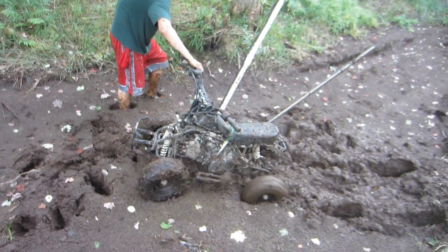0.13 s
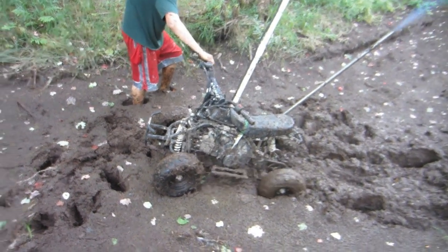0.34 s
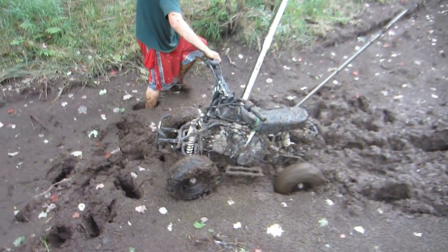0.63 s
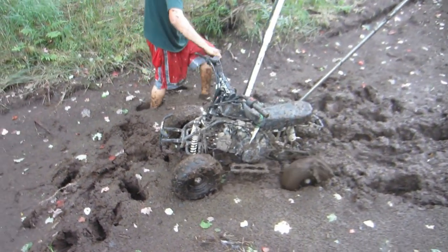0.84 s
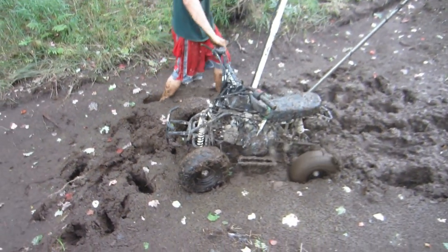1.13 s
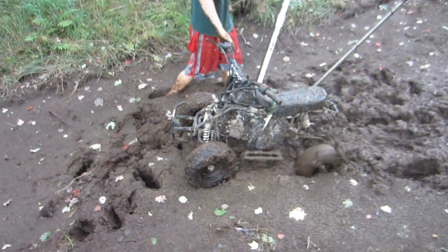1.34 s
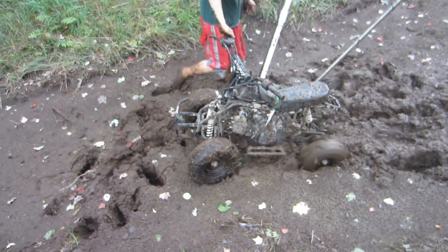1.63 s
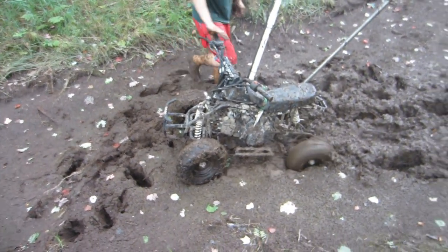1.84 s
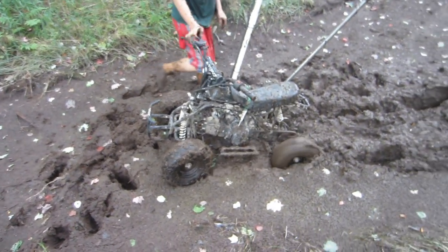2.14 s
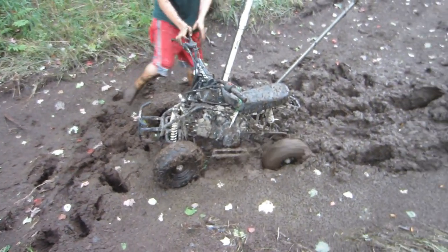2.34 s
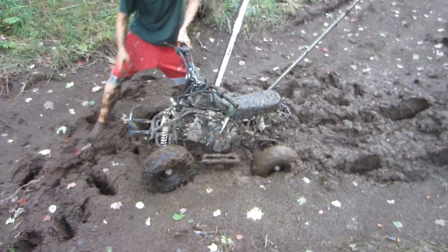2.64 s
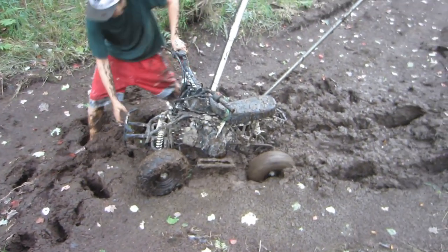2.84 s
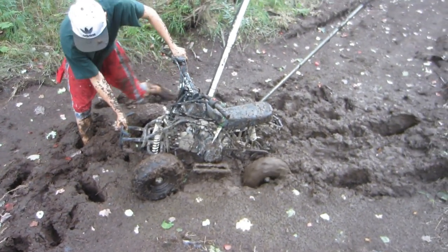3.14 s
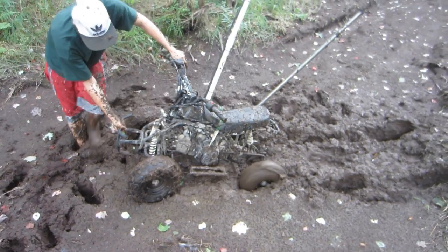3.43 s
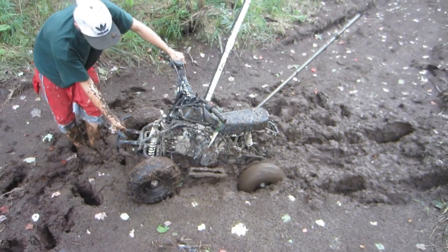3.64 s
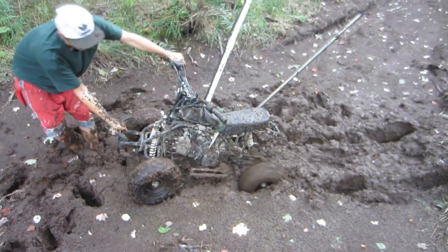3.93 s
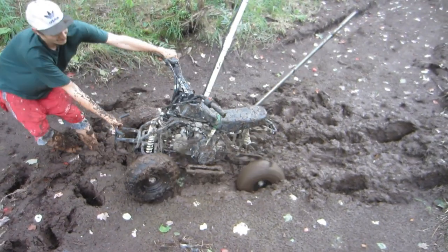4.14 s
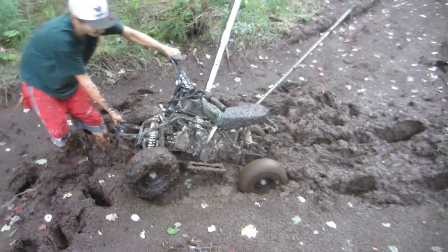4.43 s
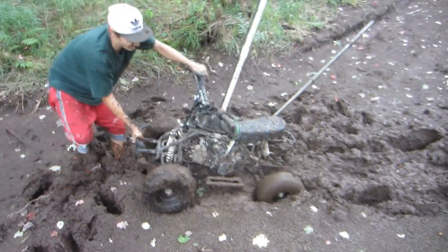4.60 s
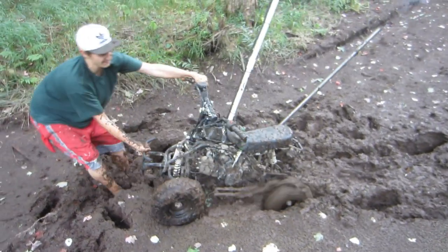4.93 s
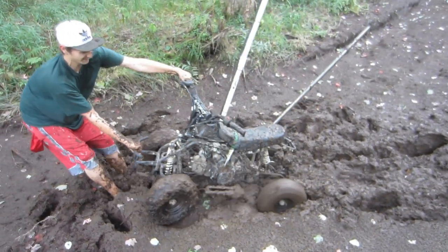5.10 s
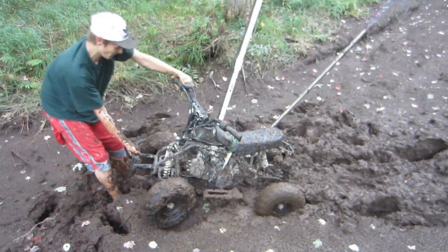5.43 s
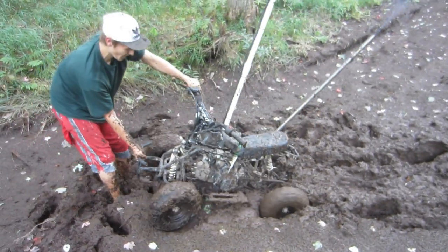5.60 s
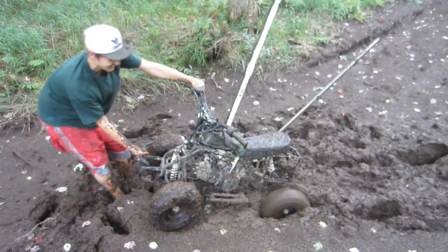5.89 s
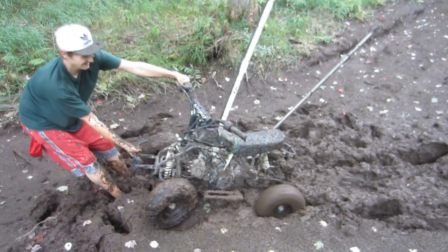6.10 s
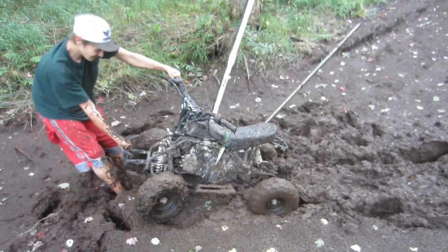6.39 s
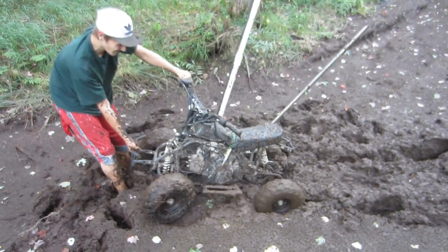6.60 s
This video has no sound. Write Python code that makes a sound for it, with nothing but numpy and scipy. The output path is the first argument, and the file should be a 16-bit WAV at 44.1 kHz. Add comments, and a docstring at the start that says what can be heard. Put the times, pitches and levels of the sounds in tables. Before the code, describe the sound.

Outdoors and close by, a small single-cylinder four-stroke quad bike is revved while stuck. Sharp barking exhaust bursts climb to a fast buzzing rasp, then drop into a hollow silencer drone with metal rattle and valve ticking. Pops crackle as the revs fall. A second big rev peaks higher, then the engine nearly dies twice and catches again. The near microphone overloads slightly; trees return only a faint scatter.

```python
"""A silencer drones over the clatter of an idling engine, and then short bursts of throttle bark out across the mud:
a small four-stroke single-cylinder quad bike, stuck outdoors, is revved close to two microphone ports.
Open, each cycle emits a pressure spike, steepest near certain speeds, with returns along the pipe and off the ground.
Shut, pushes of gas ring the silencer and loose parts rattle; the pipe pops as the revs fall, and twice the engine
nearly dies. One crankshaft curve and one throttle curve drive the engine's layers; woods scatter the bark faintly."""
import sys
import numpy as np
from scipy import signal
from scipy.fft import rfft, irfft
from scipy.io import wavfile

SR = 44100
rng = np.random.default_rng(int(sys.argv[2]) if len(sys.argv) > 2 else 0)


def dump(signal):
    """Clip the signal to [-1, 1] and save it as 16-bit WAV at the path in sys.argv[1]."""
    limited = np.clip(np.atleast_2d(signal).T, -1, 1)
    pcm = np.round(limited * 32767).astype(np.int16)
    wavfile.write(sys.argv[1], SR, pcm)


N = 297675
TIME = np.arange(N) / SR
MS = 1 / 1000  # seconds in a millisecond
CRUISE_RATE = 28  # reference speed, firings per second


def amp(db):
    """Level to amplitude: 20 dB is a factor of ten."""
    return 10 ** (np.asarray(db) / 20)


def evened(x):
    """Normalisation to unit rms, the measure of effective pressure."""
    return x / np.sqrt(np.mean(x ** 2) + 1e-20)


def curve(rows, at, axis=1):
    """Linear interpolation of one column against the first column of a table."""
    rows = np.asarray(rows)
    return np.interp(at, rows[:, 0], rows[:, axis])


def read(points, hz):
    """Linear interpolation of a spectrum on a log-frequency axis."""
    f, value = np.transpose(points)
    return np.interp(np.log(hz + 1), np.log(f + 1), value)


def colour(x, points):
    """Minimum-phase filtering: the phase follows from the (frequency [Hz], gain [dB]) response by causality."""
    size = 4096
    log_gain = np.log(amp(read(points, abs(np.fft.fftfreq(size, 1 / SR)))))
    spectrum = np.exp(np.conj(signal.hilbert(log_gain)))
    taps = np.fft.ifft(spectrum).real[:size // 2]
    return np.apply_along_axis(lambda v: signal.oaconvolve(v, taps)[:N], -1, x)


def ring(x, modes):
    """Modal superposition: parallel resonances, each with its gain at the centre."""
    return sum(amp(db) * signal.lfilter(*signal.iirpeak(hz, hz / width, SR), x) for hz, width, db in modes)


def glide(x, hz, width):
    """Heterodyning: a resonance follows a frequency curve by shifting it to zero frequency and back."""
    turn = np.exp(2j * np.pi * np.cumsum(hz) / SR)
    r = np.exp(-np.pi * width / SR)
    return 2 * (turn * signal.lfilter([1 - r], [1, -r], x / turn)).real


def lagged(x, seconds):
    """First-order relaxation: a control is followed with a time constant."""
    keep = np.exp(-1 / (seconds * SR))
    return signal.lfilter([1 - keep], [1, -keep], x)


def add(mix, s, sound):
    """Linear superposition of a sound that starts at a given time."""
    start = round(s * SR)
    part = mix[max(start, 0):max(start + len(sound), 0)]
    part += sound[max(-start, 0):][:len(part)]


# likeness of diffuse sound at the two ports: (frequency [Hz], likeness [0-1])
PORT_LIKENESS = [(100, 1), (1000, 0.93), (2500, 0.92), (5000, 0.99), (9000, 1), (14000, 0.42)]


def noise():
    """Diffuse-field coherence: white noise at two ports whose likeness depends on frequency."""
    a, b = rfft(rng.standard_normal((2, N)))
    same = np.clip(read(PORT_LIKENESS, np.fft.rfftfreq(N, 1 / SR)), 0, 1)
    return irfft(np.array([a, same * a + np.sqrt(1 - same ** 2) * b]), N)


# engine speed: (time [s], rate [firings per second])
ENGINE_SPEED = [(0.0, 17.56), (0.1, 23.18), (0.16, 21.23), (0.356, 19.72), (0.403, 24.23), (0.626, 23.97),
                (1.026, 36.47), (1.24, 45.45), (1.55, 33.5), (1.732, 38.61), (1.84, 36.23), (2.13, 27.61),
                (2.42, 21.91), (2.66, 21.06), (2.761, 24.4), (2.88, 22.78), (3.017, 21.7), (3.17, 21.85),
                (3.292, 25.37), (3.429, 23.15), (3.855, 33.49), (3.994, 34.15), (4.28, 45.08),
                (4.462, 49.2), (4.794, 33.41), (5.414, 17.7), (5.579, 24.03), (5.804, 25.81), (6.08, 31.05),
                (6.541, 19.67), (6.75, 26.29)]


def cycles():
    """Phase as the integral of rate: cycles turned so far, with a bark at each whole number."""
    return np.cumsum(curve(ENGINE_SPEED, TIME)) / SR - .25


def octaves():
    """Logarithmic speed scale: octaves above cruising speed."""
    return np.log2(curve(ENGINE_SPEED, TIME) / CRUISE_RATE)


def moments(turns):
    """Inversion of phase: times at which a count of turns passes a whole number."""
    return np.interp(np.arange(np.ceil(turns[0]), turns[-1]), turns, TIME)


# twists of the throttle: (opens [s], shuts [s], opening [dB], time to open [s])
THROTTLE_TWISTS = [(0.083, 0.138, -6, 0.02), (0.298, 0.353, -16.5, 0.014), (0.346, 1.253, -2, 0.016),
                   (1.415, 1.487, -9.5, 0.046), (1.524, 1.754, -2.5, 0.022), (1.798, 1.856, -11, 0.016),
                   (1.977, 2.305, -24.5, 0.053), (2.678, 2.81, -5.5, 0.041), (2.837, 2.955, -7.5, 0.018),
                   (2.97, 3.18, -25, 0.037), (3.163, 3.863, -3.5, 0.035), (3.84, 3.99, -10, .02),
                   (3.977, 4.495, -2, 0.011), (4.887, 4.955, -5, 0.034), (4.992, 5.046, -10, 0.0068),
                   (5.402, 5.552, -17, 0.021), (5.553, 6.09, -6, 0.15), (6.515, 6.765, -5.5, 0.2)]


def throttle(shut_s=0.01):
    """Valve opening 0-1: each twist ramps up, holds and springs shut by exponential decay."""
    t = np.arange(0, N / SR, MS)
    twists = []
    for opens, shuts, db, rise_s in THROTTLE_TWISTS:
        rise = np.clip((t - opens) / rise_s, 0, 1)
        fall = np.exp(-np.clip(t - shuts, 0, 1) / shut_s)
        twists.append(amp(db) * rise * fall)
    return np.interp(TIME, t, np.max(twists, axis=0))


# the engine starves and dies away, then catches again: (starts [s], catches [s], depth [0-1])
STALL_SPANS = [(0.13, 0.287, 0.02), (5.004, 5.426, 0.87), (6.121, 6.58, 0.88)]


def starving(fade_s=0.27, catch_s=0.014):
    """Loss of combustion: 0 while the engine fires, rising towards 1 as it dies away."""
    total = 0
    for starts, catches, depth in STALL_SPANS:
        slope = np.minimum((TIME - starts) / fade_s, (catches - TIME) / catch_s)
        total = total + np.clip(slope, 0, depth)
    return total


def overrun(opening, fade_s=0.18, db_per_octave=1.5):
    """Relaxation after closing: jumps as the throttle shuts, more at speed, then fades."""
    return np.maximum(lagged(opening, fade_s) - opening, 0) * amp(db_per_octave * octaves())


def woods(x, wet_db=-17, t60=0.11, dull_hz=3000):
    """Diffuse reverberation: faint scatter from ruts, banks and trees, decaying 60 dB in t60 seconds."""
    t = TIME[:SR // 2]
    tail = noise()[:, :len(t)] * amp(-60 * t / t60) * (1 - np.exp(-t / 0.016))
    tail = signal.lfilter(*signal.butter(1, dull_hz, fs=SR), tail)
    return amp(wet_db) * signal.fftconvolve(x, tail / np.linalg.norm(tail[0]), axes=1)[:, :N]


# squeals as the throttle snaps open: (time [s], rms level [dB], middle pitch [Hz], length [ms])
THROTTLE_SQUEALS = [(5.4157, -39, 1540, 8.5), (6.557, -39, 1590, 9.9)]


def squeals(fall=0.18):
    """Frequency glide: brief whistles fall in pitch just before the engine picks up."""
    out = np.zeros(N)
    for s, db, hz, length_ms in THROTTLE_SQUEALS:
        u = np.linspace(-1, 1, int(length_ms * MS * SR))
        tone = np.sin(2 * np.pi * np.cumsum(hz * (1 - fall * u)) / SR)
        add(out, s, amp(db) * evened(tone * (1 - u ** 2)))
    return out


# ringing of the valve gear: (frequency [Hz], width [Hz], relative level [dB])
VALVE_MODES = [(1810, 140, 8), (2130, 170, 5), (3760, 410, -6.5), (4650, 120, -4), (6190, 49, 2.5),
               (6660, 400, -10.5), (8840, 150, -4.5)]


def valves(turns, starved, level_db=-51, stall_db=-10, uneven_db=2, intake=.52, exhaust=0.0089):
    """Impulse excitation of modes: two crisp ticks of the valve gear, at set shares of every cycle."""
    ticks = np.zeros(N)
    for stroke in (intake, exhaust):
        at = (moments(turns - stroke) * SR).astype(int)
        ticks[at] = amp(uneven_db * rng.standard_normal(len(at)))
    return amp(level_db + stall_db * starved) * evened(ring(ticks, VALVE_MODES))


def casing(turns, t60=0.015):
    """Periodic excitation: three strokes a cycle knock the casing, each with one fixed impulse response."""
    t, out = TIME[:SR // 8], np.zeros((2, N))
    for stroke in (.27, .5, .97):  # share of the cycle
        knocks, at = np.zeros(N), (moments(turns - stroke) * SR).astype(int)
        # the parts knock less evenly at low speed
        slack = np.clip(1 - curve(ENGINE_SPEED, at / SR) / 50, 0, 1)
        knocks[at] = amp(2.1 * slack * rng.standard_normal(len(at)))
        response = noise()[:, :len(t)] * amp(-60 * t / t60)
        out += signal.oaconvolve(knocks[None], response, axes=1)[:, :N]
    return evened(out)


def looseness(opening, shut=1.53, lock_per_octave=2.5, tightest=0.096):
    """Preloading of joints: loose rattle shrinks as load and speed lock the parts in step."""
    lock = 1 / 2 + lock_per_octave * np.maximum(octaves(), 0)
    return np.maximum(shut - opening * lock, tightest)


def rattling(law, opening, starved, stall_db=-9, settle_s=0.0052):
    """Power summation of incoherent parts: gain from free running, load and overrun; starving fades the first."""
    free_db, free_octave_db, load_db, load_octave_db, overrun_db = law
    free = amp(free_db + free_octave_db * octaves() + stall_db * starved)
    loaded = amp(load_db + load_octave_db * octaves()) * lagged(opening, settle_s)
    closing = amp(overrun_db) * overrun(opening)
    return np.sqrt(free ** 2 + loaded ** 2 + closing ** 2)


# spectra of the low and the high rattle: (frequency [Hz], relative level [dB])
LOW_RATTLE_COLOUR = [(30, -15), (100, -26.5), (200, 10.5), (330, 7.5), (440, 0), (590, 2), (800, 0.5),
                     (1100, -6.5), (1600, -8), (2400, -19), (4000, -60)]
HIGH_RATTLE_COLOUR = [(1000, -5.5), (2000, 8), (2800, 2.5), (3800, 1), (4800, 0), (6300, -3.5),
                      (7500, -7.5), (9000, -7), (11000, -11.5), (15000, -9.5)]
# modes of the casing, heard as a whirr: (frequency [Hz], width [Hz], gain [dB])
CASING_MODES = [(520, 8.5, 5.5), (579.3, 17, 4), (993, 47, -0.5), (1105, 47, 2), (1376, 140, -3.5),
                (1990, 210, -1), (2480, 47, 3.5), (2730, 60, -8.5)]
# gains at cruising speed: (running free [dB], its growth [dB per octave of speed],
# under full load [dB], its growth [dB per octave of speed], per unit of overrun [dB])
LOW_CLATTER_LAW = (-36, 4, -24, -5.5, -28)
HIGH_CLATTER_LAW = (-49, -0.5, -38, 1, -41.5)


def clatter(turns, opening, starved, knock=0.24, knock_ms=1.1, ticks_per_s=150, tick=0.46, loose_cut_hz=330):
    """Impact noise: the casing rings in step; valves, chain and flung mud rattle loosely over it."""
    hits = tick * rng.exponential(1, N) * (rng.random(N) < ticks_per_s / SR)
    at = (moments(2 * turns) * SR).astype(int)  # two knocks a cycle
    hits[at] += knock * rng.exponential(1, len(at))
    swell = 1 + signal.lfilter([1], [1, -np.exp(-1 / (knock_ms * MS * SR))], hits)
    loose = evened(swell * noise())
    steady = casing(turns)
    # small loose parts carry little bass
    loose = signal.lfilter(*signal.butter(1, loose_cut_hz, "high", fs=SR), loose)
    low = colour(steady + looseness(opening) * loose, LOW_RATTLE_COLOUR)
    high = colour(loose + .5 * steady, HIGH_RATTLE_COLOUR)
    low = evened(low + ring(low, CASING_MODES))
    high = evened(high + ring(high, CASING_MODES))
    low_gain = rattling(LOW_CLATTER_LAW, opening, starved)
    return low_gain * low + rattling(HIGH_CLATTER_LAW, opening, starved) * high


# how strongly the machine radiates the throb, before evening: (frequency [Hz], gain [dB])
THROB_RADIATION = [(20, -27), (35, -4.5), (48, 15), (60, 12.5), (75, 5), (100, -5), (130, -17)]
# strength of the throb: (rate [firings per second], gain [dB])
THROB_GAIN_BY_SPEED = [(20, 1), (28, 2.5), (37, -2), (48, 0)]


def throb(turns, opening, starved, level_db=-50, load_db=8, stall_db=-2, overrun_db=-5, evenness=0.81):
    """Harmonics of rotation: the lowest orders swell with load and at a bass resonance, and sink on the overrun."""
    order = np.arange(1, 5)[:, None]
    speed = curve(ENGINE_SPEED, TIME)
    gains = amp(read(THROB_RADIATION, order * speed))
    orders = (gains * np.sin(2 * np.pi * order * turns)).sum(0)
    orders = orders / np.linalg.norm(gains, axis=0) ** evenness  # evens out most of the change with speed
    effort_db = curve(THROB_GAIN_BY_SPEED, speed) + load_db * opening
    effort_db += stall_db * starved + overrun_db * overrun(opening)
    return amp(level_db + effort_db) * evened(orders)


# silencer resonances, heated in the drone: (frequency at 25 firings a second [Hz], width [Hz], relative level [dB])
SILENCER_MODES = [(169.3, 9.2, -3.5), (278.3, 17.8, 9.5), (398.6, 7, -7), (547, 30, -5), (638, 31, -15.5)]
# heavy gulps at small throttle: (time [s], peak level [dB])
THROTTLE_GULPS = [(.299, -12), (.349, -10.5), (1.532, -19), (2.011, -34)]


def gulps():
    """Impulse response: single strong pushes, after which the silencer rings out."""
    hum, out = ring(signal.unit_impulse(SR // 4), SILENCER_MODES), np.zeros(N)
    for s, db in THROTTLE_GULPS:
        add(out, s, amp(db) * hum / abs(hum).max())
    return out


# drone while firing, strongest with the throttle just cracked open: (opening [0-1], gain [dB])
DRONE_GAIN = [(0, -32), (.08, -27), (.17, -35), (.25, -41), (.75, -43.5)]
# resonances of the low burble, passed twice: (frequency [Hz], width [Hz], gain per pass [dB])
LOW_BURBLE_MODES = [(169.4, 18, -0.5), (227, 87, -2)]


def drone(turns, opening, starved, stroke=0.014, warming=0.0037, stall_cooling=0.073, stall_db=-18,
          burble_db=-46, idle_burble_db=-46, burble_load_db=-30, echo=0.41, echo_ms=10.67, turbulence=0.0054):
    """Forced resonance: a push a cycle, its return and turbulence ring the silencer, with a burble on the overrun."""
    s = moments(turns + stroke)
    pushes = np.zeros(N)
    for at, size in zip(s, amp(1.1 * rng.standard_normal((len(s), 1)))):
        add(pushes, at, -size)
        add(pushes, at + echo_ms * MS, -echo * size)
    pushes += turbulence * rng.standard_normal(N) * np.exp(-((turns + stroke) % 1) / 0.32)
    # hot gas raises every resonance
    heat = 1 + warming * (curve(ENGINE_SPEED, TIME) - 25) - stall_cooling * starved
    hum = sum(amp(db) * glide(pushes, hz * heat, width) for hz, width, db in SILENCER_MODES)
    hum = signal.lfilter(*signal.butter(2, [140, 900], "band", fs=SR), hum)
    burble = ring(ring(pushes, LOW_BURBLE_MODES), LOW_BURBLE_MODES)
    burbling = amp(burble_db) * overrun(opening) + amp(idle_burble_db + burble_load_db * opening)
    humming = amp(curve(DRONE_GAIN, opening))
    return amp(stall_db * starved) * (humming * evened(hum) + burbling * evened(burble))


def spike(s, height, width_ms, skirt=0.14, skirt_ms=1.0):
    """Finite pulse width: a steep tip on a broad skirt, each as wide as stated at half height; (start, sound)."""
    t = np.arange(-SR // 400, SR // 400) / SR
    start = round(s * SR) / SR
    off_ms = abs(t + start - s) / MS
    tip = .5 ** ((2 * off_ms / width_ms) ** 1.22)
    base = .5 ** ((2 * off_ms / skirt_ms) ** 2)
    return start + t[0], -height * ((1 - skirt) * tip + skirt * base)


# the pipe comes into tune at two speeds, where the spike is taller and steeper:
# (rate [firings per second], height gain [dB], width at the widest opening [ms])
SPIKE_TUNING = [(21.4, 3, 0.85), (24.15, 0.35, 0.56), (28, 0, 0.26), (29.2, 6.5, 0.072),
                (30.73, -2.5, 0.27), (34.3, -1.5, 0.19), (35.4, 3, 0.098), (37.3, -1.5, 0.13),
                (41.5, -4.5, .13)]


def firings(turns, opening, starved, uneven_db=1.05, idle_db=-31, stall_db=-10, blunting=0.36,
            uneven_width_db=0.5, bluntest_ms=0.76):
    """Wave steepening: charge and pipe tuning set each spike, weak ones blunter; (time [s], height [dB], width [ms])."""
    s = moments(turns)
    speed = curve(ENGINE_SPEED, s)
    charge = np.interp(s, TIME, np.maximum(opening, amp(idle_db + stall_db * starved)))
    height_db = 20 * np.log10(charge) + curve(SPIKE_TUNING, speed) + uneven_db * rng.standard_normal(len(s))
    width_ms = curve(SPIKE_TUNING, speed, axis=2) * (opening.max() / charge) ** blunting
    width_ms = width_ms * amp(uneven_width_db * rng.standard_normal(len(s)))
    return np.c_[s, height_db, np.minimum(width_ms, bluntest_ms)]


# spectrum of the rasp behind the spikes, also that of the scatter: (frequency [Hz], relative level [dB])
RASP_COLOUR = [(300, -39.5), (700, -6), (1200, 7), (2000, -5), (3000, -2.5), (4500, -13.5), (9000, -17),
               (14000, -9.5)]


def scatter(spikes, level_db=-13, fade_ms=9, build_ms=1.2):
    """Multiple scattering: frame, wheels and ruts return a dense spray of echoes, the same after every firing."""
    t = TIME[:SR // 16]
    envelope = np.exp(-t / (fade_ms * MS)) * (1 - np.exp(-t / (build_ms * MS)))
    echoes = colour(noise(), RASP_COLOUR)[:, :len(t)] * envelope
    return amp(level_db) * signal.oaconvolve(spikes[None], echoes / np.linalg.norm(echoes[0]), axes=1)[:, :N]


# gas streaming without a pause near top speed: (rate [firings per second], share at the widest opening [0-1])
STREAMING_SHARE = [(35, 0.1), (41, 0.1), (46, 1)]


def streaming(gas, opening, thin_hz=265, howl_hz=278, howl_width_hz=45, howl_db=6.5):
    """Continuous flow in place of pulses: flat out, the bark loses bass and one chamber resonance howls."""
    share = np.clip(curve(STREAMING_SHARE, curve(ENGINE_SPEED, TIME)) * opening / opening.max(), 0, 1)
    thin = signal.filtfilt(*signal.butter(3, thin_hz, "high", fs=SR), gas)
    thin = thin + ring(thin, [(howl_hz, howl_width_hz, howl_db)])
    return gas + share * (thin - gas)


# afterfire in the pipe, mostly on the overrun, before the returns scale it:
# (time [s], height [dB], width [ms], never under 0.06)
AFTERFIRE = [(0.222, -20.5, 0.4), (0.81, -11, 0.051), (1.012, -13, 0.051), (1.275, -12, 0.56),
             (1.2999, -11.5, 0.23), (1.312, -17.5, 0.19), (1.3352, -6, 0.087), (1.359, -7, 0.092),
             (1.383, -5.5, 0.077), (1.4076, -11, 0.17), (1.4215, -13, 0.31), (1.435, -13.5, 0.22),
             (1.778, -15, .25), (1.877, -19, 0.28), (1.934, -18.5, 0.13), (2.076, -42, .3),
             (2.112, -18, 0.25), (2.131, -18, 0.26), (2.7672, -7, 0.071), (3.2554, -5, 0.1),
             (3.6795, -30, 0.058), (4.074, -5.5, 0.052), (4.4978, -18, 0.2), (4.5128, -18, 0.072),
             (4.522, -8, 0.078), (4.5352, -9, 0.064), (4.543, -8, 0.13), (4.556, -13, 0.12),
             (4.566, -7, 0.081), (4.578, -14, 0.098), (4.5869, -6.5, 0.1), (4.601, -24, 0.23),
             (4.6111, -8.5, 0.15), (4.624, -17, 0.14), (4.6345, -9.5, 0.29), (4.648, -7.5, 0.075),
             (4.6724, -18, 0.3), (4.782, -26, 0.22), (4.8105, -22, 0.32), (4.9734, -14, 0.053),
             (5.045, -21, 0.18)]
# the spike and its returns: (delay before travel scaling [ms], height [factor], width [factor])
PIPE_RETURNS = [(0, 0.81, 1.257), (1.35, 0.033, 3.3), (3.0, 0.097, 2.8), (6.1, 0.048, 3.2),
                (11.7, 0.16, 0.35), (17.2, 0.08, 1.6)]
# colour of the pipe mouth: (frequency [Hz], gain [dB])
MOUTH_COLOUR = [(50, -19.5), (90, -5.5), (170, 5.5), (280, -1.5), (470, -5), (600, 1), (1050, 3),
                (1600, -0.5), (3000, 2), (6000, 7), (9000, 5.5), (14000, -20)]
# gas rushing out behind each spike: (frequency [Hz], relative level [dB])
RUSH_COLOUR = [(150, -38), (400, -9), (900, -9.5), (2000, -1.5), (3500, -6.5), (6500, -6), (9000, -11.5),
               (14000, -22)]
# ringing of pipe and air box: (frequency [Hz], width [Hz], gain [dB])
PIPE_MODES = [(1105, 140, 0.5), (1174, 38, -13.5), (1490, 260, -3), (1980, 330, -4.5), (2550, 55, -12),
              (2750, 95, -0.5), (3300, 210, -8), (3900, 89, -24)]
# low exhaust resonances, rising as the gas heats:
# (frequency at cruising speed [Hz], width [Hz], gain [dB], rise [Hz per firing a second])
CHAMBER_MODES = [(170.7, 14, -1, 0.61), (261, 24, -10, 0.47), (333, 21, -6, .3), (518, 30, -8, 0.77),
                 (576, 123, -4.5, 3.3), (728, 80, -1.5, 0.77), (912, 39, 1.5, 1.06)]


def bark(turns, opening, starved, level_db=3.0, rush_db=-14.0, rush_ms=3.38, rush_growth=0.56,
         rush_uneven_db=1.5, ground=0.36, ground_per_ms=0.33, ground_ms=3.554, lag=0.3, blur=1.12, cut_hz=165,
         hastening=0.0026, rasp_db=-30, rasp_ms=14, crackles_per_s=2500):
    """Pulse radiation and reflection: each firing sends a spike, pipe returns, a puff and a rasp; spikes bounce once."""
    (spikes, puffs, tails), age = np.zeros((3, N)), np.arange(SR // 20) / SR
    faster = curve(ENGINE_SPEED, TIME) - CRUISE_RATE
    for s, db, width_ms in np.vstack([firings(turns, opening, starved), AFTERFIRE]):
        width_ms = max(width_ms, .06)
        bounce = (ground_ms - lag * width_ms) * MS  # a steep front outruns its echo
        # steep waves and hot gas run the pipe faster
        travel = 1 + 0.046 * (width_ms - .4) - hastening * faster[int(s * SR)]
        mirrored = min(ground + ground_per_ms * width_ms, .95)  # mud throws back blunt spikes best
        puff_gain = amp(db + rush_uneven_db * rng.standard_normal())
        puff = puff_gain * width_ms ** rush_growth * np.exp(-age / (rush_ms * MS))  # slow gulps hiss more
        for delay_ms, height, wider in PIPE_RETURNS:
            at = s + delay_ms * MS * travel
            add(spikes, *spike(at, amp(db) * height, width_ms * wider))
            add(spikes, *spike(at + bounce, amp(db) * height * mirrored, width_ms * wider * blur))
            add(puffs, at, height * puff)
        add(tails, s, amp(db) * np.exp(-age / (rasp_ms * MS)))
    # gas crackles on between firings
    crackles = rng.standard_normal(N) * (rng.random(N) < crackles_per_s / SR)
    gas = amp(level_db) * colour(spikes, MOUTH_COLOUR)
    gas = gas + amp(rush_db) * puffs * evened(colour(noise(), RUSH_COLOUR))
    gas = gas + scatter(spikes) + amp(rasp_db) * tails * evened(colour(crackles, RASP_COLOUR))
    gas = signal.lfilter(*signal.butter(2, cut_hz, "high", fs=SR), gas)  # a small mouth radiates little bass
    chambers = sum(amp(db) * glide(gas, hz + rise_hz * faster, width)
                   for hz, width, db, rise_hz in CHAMBER_MODES)
    return streaming(gas + ring(gas, PIPE_MODES) + chambers, opening)


def scene():
    """Superposition of sources: one crankshaft and one throttle drive the engine's layers."""
    engine = turns, opening, starved = cycles(), throttle(), starving()
    barks = bark(*engine)
    exhaust = barks + woods(barks) + drone(*engine) + gulps()
    machine = throb(*engine) + clatter(*engine) + valves(turns, starved)
    return exhaust + machine + squeals()


# colour of the microphone: (frequency [Hz], gain [dB])
MICROPHONE_COLOUR = [(20, 1), (8000, -2), (10000, -9), (11200, -16), (12200, -27), (13500, -17.5),
                     (15500, -19)]
# balance of the ports: (frequency [Hz], left minus right [dB])
PORT_BALANCE = [(60, 3), (110, 2.5), (200, 2), (380, 1.9), (700, 1.6), (1290, 1), (2380, -1), (4400, -0.5),
                (8120, -0.5), (15000, -0.5)]


def record(dry, left_lag_ms=0.018, ceiling=0.84, edge_hz=16300):
    """Interaural-style level and time difference at two close ports, overload by clipping, then a band limit."""
    hz = np.fft.rfftfreq(N, 1 / SR)
    side = np.array([[.5], [-.5]])  # left, right
    ports = amp(side * read(PORT_BALANCE, hz)) * np.exp(-2j * np.pi * hz * side * left_lag_ms * MS)
    clipped = np.clip(irfft(rfft(dry) * ports, N), -ceiling, ceiling)
    heard = colour(clipped, MICROPHONE_COLOUR)
    low_pass = signal.firwin(511, edge_hz, window=("kaiser", 9), fs=SR)
    return signal.oaconvolve(heard, low_pass[None], "same")


dry = scene()
out = record(dry)
dump(out)
```